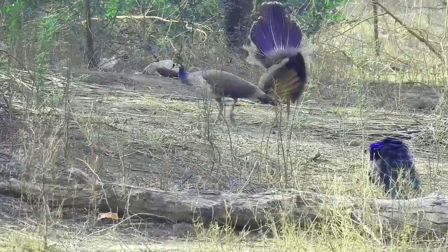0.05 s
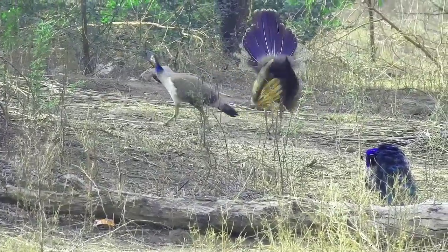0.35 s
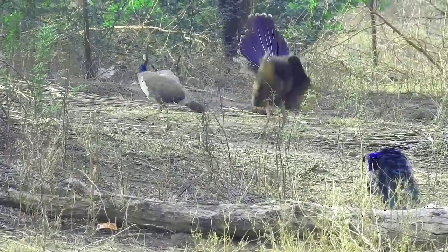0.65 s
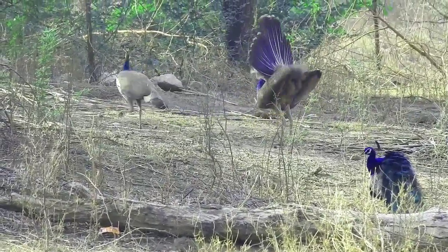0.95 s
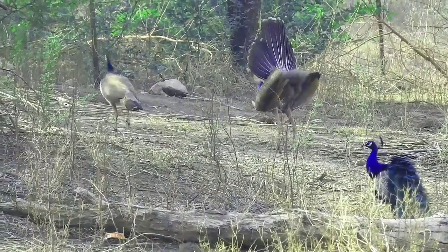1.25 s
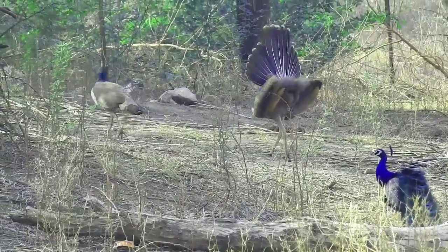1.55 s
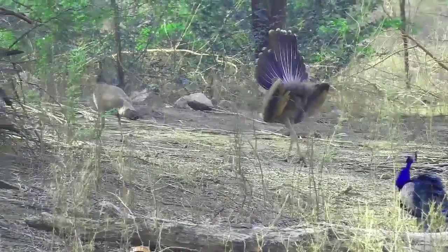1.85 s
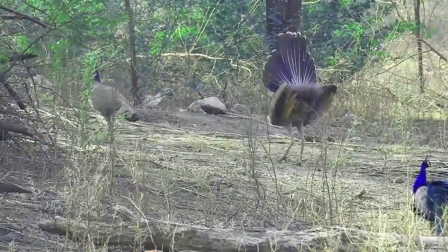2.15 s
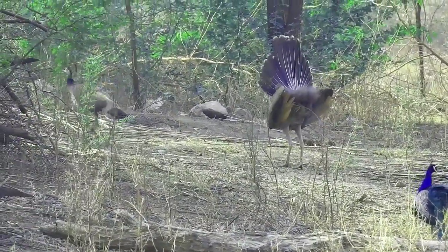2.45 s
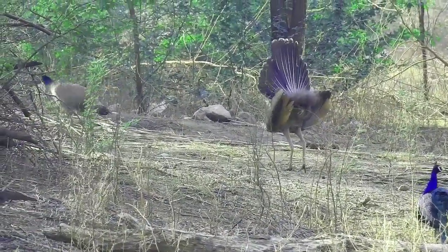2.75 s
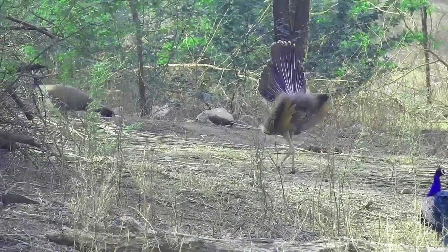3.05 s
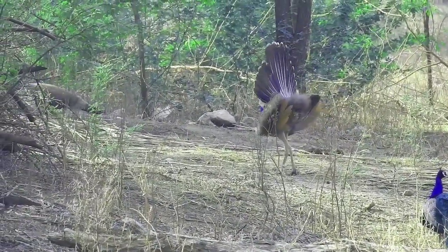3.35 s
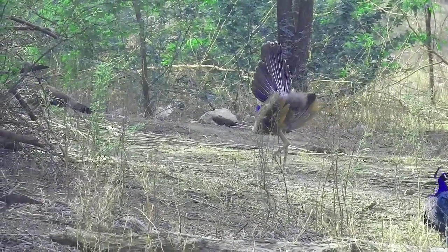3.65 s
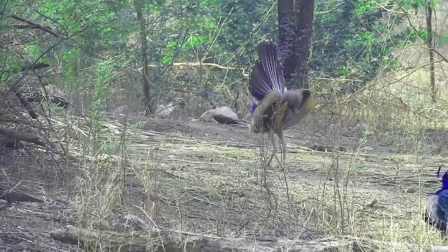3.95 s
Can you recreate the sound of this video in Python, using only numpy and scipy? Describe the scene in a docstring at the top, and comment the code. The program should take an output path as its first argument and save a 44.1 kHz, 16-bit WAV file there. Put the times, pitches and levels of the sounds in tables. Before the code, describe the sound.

Small birds squabble with harsh falling squawks and high chirps over low wind rumble.

```python
"""Small birds squabble in dry open woodland: falling squawks, held cries that break downward, stuttering
chips and one upslurred whistle. Each voice is a harmonic source, the syrinx, filtered by throat and beak,
then reflected by the ground and scattered by the trees. Farther off, others rasp, churr and peep, and a
twig snaps. Turbulence in a light wind buffets each side of the microphone over a faint outdoor hush."""
import sys
import numpy as np
from scipy import signal
from scipy.fft import rfft, irfft
from scipy.io import wavfile
from scipy.ndimage import uniform_filter1d, minimum_filter1d

SR = 44100
rng = np.random.default_rng(int(sys.argv[2]) if len(sys.argv) > 2 else 0)


def dump_mix(stems):
    """Bounce the given channels to the path in sys.argv[1] as a 16-bit WAV at rate SR."""
    frames = np.atleast_2d(stems).T  # one column per channel
    limited = np.clip(frames, -1, 1)  # hard clip at full scale
    pcm = np.round(limited * 32767).astype(np.int16)
    wavfile.write(sys.argv[1], SR, pcm)


N = 176400
TIME = np.arange(N) / SR

# resonances of throat and beak, for near and for far birds: (frequency [Hz], gain [dB])
NEAR_THROAT = [(1100, -22.5), (2000, -18.5), (2500, -6), (3100, -4), (4200, 3), (5000, 0.5), (6300, -1.5),
               (8300, -8), (9500, -35.5), (15000, -66)]
FAR_THROAT = [(1000, -17), (1700, -4.5), (2300, 3), (3500, 5), (6300, -5), (8000, -10), (11000, -34.5)]


def from_db(db):
    """Amplitude ratio from decibels."""
    return 10 ** (np.asarray(db) / 20)


def unit_rms(x):
    """Normalisation to unit RMS."""
    return x / np.sqrt(np.mean(x ** 2) + 1e-20)


def at_hz(points, hz):
    """Interpolation on a log-frequency axis."""
    f, value = np.transpose(points)
    return np.interp(np.log(np.maximum(hz, 1)), np.log(f), value)


def colour(x, spectrum):
    """Spectral shaping by (frequency [Hz], gain [dB]) points, at unit RMS."""
    size = x.shape[-1]
    gain = from_db(at_hz(spectrum, np.fft.rfftfreq(size, 1 / SR)))
    return unit_rms(irfft(rfft(x) * gain, size))


def drift(rate_hz, size):
    """Low-pass filtered noise: a smooth random wander with a spread near 1."""
    pole = np.exp(-2 * np.pi * rate_hz / SR)
    wander = signal.lfilter([1], [1, -2 * pole, pole * pole], rng.standard_normal(SR // 2))
    return unit_rms(wander)[SR // 10:][:size]


def ramp(length_s):
    """Linear progress from 0 to 1 through a note."""
    return np.linspace(0, 1, max(int(length_s * SR), 2))


def add(track, s, sound):
    """Superposition of a sound on a track, from time s."""
    i = max(int(s * SR), 0)
    track[i:i + len(sound)] += sound[:N - i]


def diffuse(size):
    """Diffuse-field noise: coherence between the two sides falls as frequency rises."""
    # likeness of left and right: (frequency [Hz], coherence [ratio])
    likeness = [(600, 0.77), (4500, 0.62), (7000, 0)]
    mid, side = rfft(rng.standard_normal((2, size)))
    coherence = at_hz(likeness, np.fft.rfftfreq(size, 1 / SR))
    return irfft(np.sqrt(1 + coherence) * mid + np.sqrt(1 - coherence) * side * [[1], [-1]], size)


def hush():
    """Faint ambient noise, arriving from all round as a diffuse field."""
    # outdoor noise spectrum: (frequency [Hz], relative density [dB])
    spectrum = [(400, -5), (600, 1), (1000, -9), (1800, -8), (3000, -6.5), (4300, -4), (6300, -2),
                (8000, -12.5), (10000, -18), (15000, -23)]
    return from_db(-46) * colour(diffuse(N), spectrum)


def wind():
    """Turbulent pressure, independent on each side; breeze and buffets add in power."""
    # buffets: (time [s], Gaussian half-width [s], left level [dB], right level [dB])
    gusts = [(0.771, 0.034, -35, -13.5), (1.008, 0.024, -14, -20.5), (1.466, 0.021, -13.5, -50),
             (2.037, .04, -13, -40), (2.13, 0.12, -46, -21), (2.34, 0.012, -22, -2.5),
             (2.545, 0.14, -18, -17), (2.753, 0.031, -28, -11.5), (2.883, 0.032, -11, -17.5),
             (2.948, 0.0065, -16, -6.5), (3.047, 0.052, -11, -15), (3.17, 0.013, -5.5, -26),
             (3.374, 0.033, -17.5, -17.5), (3.694, 0.035, -20, -15)]
    # steady breeze: (left level [dB], right level [dB])
    breeze_db = [-22.5, -27.5]
    # turbulence spectrum: (frequency [Hz], relative density [dB])
    spectrum = [(20, -27), (35, -13), (65, 2), (100, -0.5), (200, -16.5), (300, -37.5), (450, -66),
                (900, -74.5)]
    power = from_db(breeze_db)[:, None] ** 2 * np.ones(N)
    for s, half_s, left_db, right_db in gusts:
        swell = np.exp(-((TIME - s) / half_s) ** 2 / 2)
        power += (from_db([[left_db], [right_db]]) * swell) ** 2
    eddies = colour(rng.standard_normal((2, N)), spectrum)
    eddies /= np.sqrt(uniform_filter1d(uniform_filter1d(eddies ** 2, 1500), 1500))   # even out the level
    # hard buffets bring out eddies an octave higher
    small_eddies = colour(rng.standard_normal((2, N)), np.array(spectrum) * [2, 1])
    return eddies * np.sqrt(power) + from_db(-16) * small_eddies * power


def woodland(x, left_lead_us, wet_db):
    """Multipath propagation: direct sound, a ground reflection, and scatter from brush and trunks."""
    trunks_t60_s, brush_t60_s, echo_s = .7, .12, .0028
    t = TIME[:SR]
    decay = from_db(-60 * t / trunks_t60_s) + from_db(10 - 60 * t / brush_t60_s)
    build_up = 1 - np.exp(-t / .0021)
    scatter = diffuse(SR) * decay * build_up
    scatter *= from_db(wet_db) / np.sqrt((scatter ** 2).sum() / 2)
    minus_jw = -2j * np.pi * np.fft.rfftfreq(N + SR, 1 / SR)
    lag_s = left_lead_us / 2e6 * np.array([[-1], [1]])
    ground_comb = 1 + from_db(-9) * np.exp(minus_jw * echo_s)
    response = np.exp(minus_jw * lag_s) * ground_comb + rfft(scatter, N + SR)
    return irfft(rfft(x, N + SR) * response, N + SR)[:, :N]


def twig():
    """Brittle fracture: a band of noise that decays exponentially."""
    out = np.zeros(N)
    peak_hz, decay_s = 6600, .0015
    snap = colour(rng.standard_normal(SR // 20), [(peak_hz / 2, -25), (peak_hz, 0), (peak_hz * 2, -30)])
    add(out, .629, from_db(-28) * snap * np.exp(-TIME[:len(snap)] / decay_s))
    return out


def syrinx(hz, db, throat, jitter, hiss_db, jitter_hz=350, flutter_db=2, edge_s=.00091,
           tilt_db=0, rasp=0):
    """Source-filter voice: jittering harmonics and air noise, weighted by the throat's resonances."""
    size, wander_db, rasp_hz = len(hz), 3, 699
    hz = hz * (1 + jitter * drift(jitter_hz, size))
    phase = 2 * np.pi * np.cumsum(hz) / SR
    k = np.arange(1, 10)[:, None]   # harmonic numbers
    wander = wander_db * np.array([drift(55, size) for _ in k])
    weights = from_db(at_hz(throat, k * hz) + wander + tilt_db * (k - 1)) * (k * hz < SR / 2)
    tone = (weights * np.sin(k * phase)).sum(0) / np.sqrt((weights ** 2).sum(0) / 2)
    # amplitude modulation puts rasping sidebands between the harmonics
    rattle_hz = rasp_hz * (1 + drift(jitter_hz, size) / 2)
    rattle = np.sin(2 * np.pi * np.cumsum(rattle_hz) / SR)
    tone = unit_rms(tone * (1 + rasp * rattle))
    air = from_db(hiss_db) * colour(rng.standard_normal(SR // 2), throat)[:size]
    edges = np.minimum(1, np.minimum(TIME[:size], TIME[:size][::-1]) / edge_s)
    return (tone + air) * edges * from_db(db + flutter_db * drift(280, size))


def far_slurs():
    """Linear frequency sweeps, each falling by a quarter."""
    # quick slurs: (time [s], duration [s], start pitch [Hz], level [dB])
    notes = [(2.799, 0.032, 5300, -44), (3.1, 0.034, 5510, -42), (3.125, 0.027, 5830, -43.5),
             (3.43, 0.027, 5260, -41.5)]
    out = np.zeros(N)
    for s, length_s, start_hz, db in notes:
        hz = start_hz * (1 - .25 * ramp(length_s))
        add(out, s, syrinx(hz, db, FAR_THROAT, jitter=.0096, hiss_db=-25))
    return out


def far_scolding():
    """Deep random frequency modulation makes calls hoarse; a train of rising sweeps makes a churr."""
    # hoarse calls: (time [s], duration [s], start pitch [Hz], end pitch [Hz], level [dB])
    rasps = [(0.366, 0.059, 5430, 5070, -37.5), (0.41, 0.098, 4603, 3700, -36),
             (2.892, 0.1, 5370, 5470, -50)]
    # sweeps of the churr: (time [s], level [dB])
    churr = [(.128, -39.5), (0.158, -40), (.192, -36), (0.227, -35.5), (0.251, -38.5)]
    out = np.zeros(N)
    for s, length_s, start_hz, end_hz, db in rasps:
        hz = start_hz + (end_hz - start_hz) * ramp(length_s)
        add(out, s, syrinx(hz, db, FAR_THROAT, jitter=.0758, hiss_db=-8, jitter_hz=587,
                           flutter_db=3.5, edge_s=.0079))
    sweep_hz = 850 + (1613 - 850) * ramp(.03) ** 1.5
    for s, db in churr:
        add(out, s, syrinx(sweep_hz, db, FAR_THROAT, jitter=.012, hiss_db=-11, edge_s=.005))
    return out


def far_peeps():
    """Falling glides that level out; weak overtones make them thin."""
    # peeps: (time [s], end pitch [Hz], level [dB])
    notes = [(3.11, 4680, -52.5), (3.16, 4490, -35.5), (3.18, 4150, -41.5), (3.194, 6240, -33),
             (3.262, 4450, -34.5), (3.301, 6280, -37), (3.392, 4300, -35.5), (3.426, 6180, -32),
             (3.474, 3950, -42.5), (3.537, 4395, -36), (3.567, 6190, -30.5), (3.686, 4390, -37.5),
             (3.715, 6220, -31)]
    out = np.zeros(N)
    for s, end_hz, db in notes:
        length_s, drop_hz = rng.uniform(.8, 1.2, 2) * [.0256, 637]
        hz = end_hz + drop_hz * (1 - ramp(length_s)) ** 1.8
        add(out, s, syrinx(hz, db, FAR_THROAT, jitter=.0089, hiss_db=-44, edge_s=.0094, tilt_db=-5))
    return out


def whistle():
    """A nearly pure tone, frequency-modulated along a wavering upward slur."""
    # whistle contour: (time [s], pitch [Hz], level [dB])
    contour = [(2.346, 5510, -7), (2.348, 6310, -17.5), (2.354, 4460, -16.5), (2.356, 5815, -14),
               (2.362, 5075, -8), (2.385, 5355, -10), (2.403, 5330, -15.5), (2.414, 5760, -14),
               (2.429, 6460, -9.5), (2.435, 6530, -20)]
    out = np.zeros(N)
    s, hz, db = np.transpose(contour)
    t = np.arange(s[0], s[-1], 1 / SR)
    add(out, s[0], syrinx(np.interp(t, s, hz), np.interp(t, s, db), NEAR_THROAT,
                          jitter=.0036, hiss_db=-47, flutter_db=1.36))
    return out


def chips():
    """Coupled frequency and amplitude modulation: each chip stutters upward, then slides down."""
    # chips: (time of top [s], stutter [s], top pitch [Hz], slide [s], end pitch [Hz], level [dB])
    notes = [(1.791, 0.039, 6440, 0.0134, 5070, -20), (1.891, 0.025, 5840, 0.019, 5060, -14),
             (1.989, 0.019, 6600, 0.013, 4660, -9), (2.09, 0.026, 6390, 0.0125, 5040, -7),
             (2.181, 0.025, 6665, 0.0067, 5090, -4), (2.275, 0.03, 6394, 0.009, 4990, -3)]
    rate_hz, swing_hz, climb_hz, dip_db, grow_db = 161, 628, 1013, 20, 8.5
    out = np.zeros(N)
    for s, stutter_s, top_hz, slide_s, end_hz, db in notes:
        remaining, slide = 1 - ramp(stutter_s), ramp(slide_s)
        swing = np.cos(2 * np.pi * rate_hz * stutter_s * remaining)
        stutter_hz = top_hz - climb_hz * remaining + swing_hz * (swing - .3)
        stutter_db = -grow_db * remaining + dip_db * (swing - 1) / 2 * np.sqrt(remaining)
        hz = np.r_[stutter_hz, top_hz + (end_hz - top_hz) * slide]
        level = db + np.r_[stutter_db, -10 * slide ** 2]
        add(out, s - stutter_s, syrinx(hz, level, NEAR_THROAT, jitter=.008, hiss_db=-25,
                                       flutter_db=1.2, edge_s=.001))
    breath = colour(rng.standard_normal(N), [(5000, -16), (12000, -6)])
    return out + from_db(-30.5) * np.abs(out) * breath


def swoop(track, top_s, top_hz, db):
    """Onset transient of a squawk or cry: pitch, level and overtones rise together until top_s."""
    length_s = .034
    rise = ramp(length_s)
    hz = top_hz * (.35 + .65 * rise)
    level = db - .5 - 20 * (1 - rise)
    add(track, top_s - length_s, syrinx(hz, level, NEAR_THROAT, jitter=.05, hiss_db=-11,
                                        edge_s=.005, tilt_db=-2.5 * (1 - rise)))


def cries():
    """Register break: a held note roughens, then jumps to a lower one that falls."""
    # cries: (time [s], hold [s], held pitch [Hz], held level [dB],
    #         fall [s], end pitch [Hz], fall level [dB])
    calls = [(1.162, 0.065, 3338, -16.5, 0.066, 1464, -15.5), (1.425, 0.038, 3096, -17, 0.066, 1456, -16),
             (1.663, 0.038, 2995, -14, 0.062, 1465, -14), (1.906, .042, 3025, -14.5, .054, 1477, -13),
             (2.162, 0.037, 2920, -17.5, 0.06, 1459, -18)]
    break_hz = 2352
    out = np.zeros(N)
    for s, hold_s, held_hz, held_db, fall_s, end_hz, fall_db in calls:
        hold, fall = ramp(hold_s), ramp(fall_s)
        upper_hz = held_hz * (1 - .114 * hold ** 3)
        lower_hz = break_hz + (end_hz - break_hz) * fall ** .81
        swoop(out, s, break_hz, held_db)
        add(out, s, syrinx(upper_hz, held_db - 3 * hold, NEAR_THROAT, jitter=.006, hiss_db=-17,
                           tilt_db=-12 + 15 * hold, rasp=hold / 2))
        add(out, s + hold_s, syrinx(lower_hz, fall_db - 2 * fall, NEAR_THROAT,
                                    jitter=.017, hiss_db=-16, rasp=.45))
    return out


def squawks():
    """Resonance lifts the overtones above the fundamental: nasal calls that sag ever faster."""
    # squawks: (time of top [s], fall [s], top pitch [Hz], end pitch [Hz], level [dB])
    calls = [(.782, 0.066, 2097, 1246, -21), (0.98, 0.061, 2018, 1303, -19),
             (1.173, 0.063, 2015, 1403, -19), (1.373, 0.073, 2007, 1445, -20),
             (1.582, 0.062, 2010, 1300, -19.5), (1.932, 0.049, 2108, 1657, -18.5),
             (2.241, 0.053, 2040, 1389, -21.5)]
    out = np.zeros(N)
    for s, fall_s, top_hz, end_hz, db in calls:
        fall = ramp(fall_s)
        hz = top_hz + (end_hz - top_hz) * fall ** 1.55
        swoop(out, s, top_hz, db)
        add(out, s, syrinx(hz, db - 3 * fall, NEAR_THROAT, jitter=.016, hiss_db=-17, flutter_db=2.5))
    return out


def scene():
    """Superposition of birds, wind and hush; far sources have a larger share of scattered sound."""
    near = woodland(squawks(), left_lead_us=58, wet_db=-7)
    near += woodland(cries(), left_lead_us=48, wet_db=-7)
    near += woodland(chips() + whistle(), left_lead_us=11, wet_db=-11)
    far = woodland(far_peeps(), left_lead_us=-38, wet_db=-.5)
    far += woodland(far_scolding() + twig() + far_slurs(), left_lead_us=-37, wet_db=1)
    return near + far + wind() + hush()


def record(dry):
    """Fast peak limiting, then a low-pass filter that stops the treble above 16 kHz."""
    gain = minimum_filter1d(np.minimum(1, .98 / np.abs(dry).max(0)), size=265)
    limited = dry * uniform_filter1d(uniform_filter1d(gain, size=131), size=131)
    return signal.sosfilt(signal.cheby2(20, 80, 16000, fs=SR, output="sos"), limited)


dry = scene()
out = record(dry)
dump_mix(out)
```